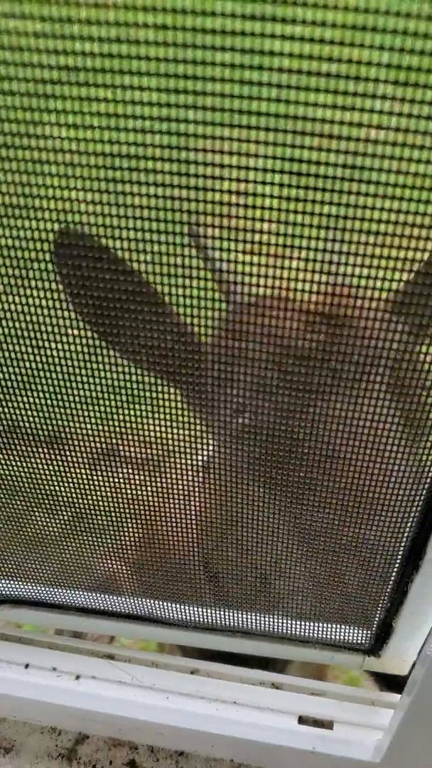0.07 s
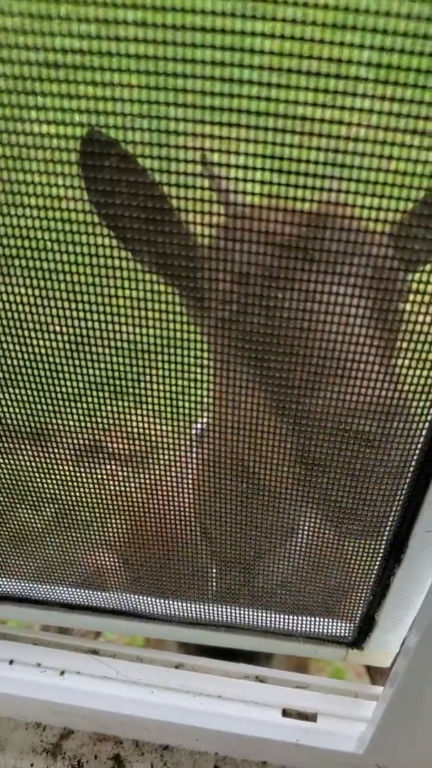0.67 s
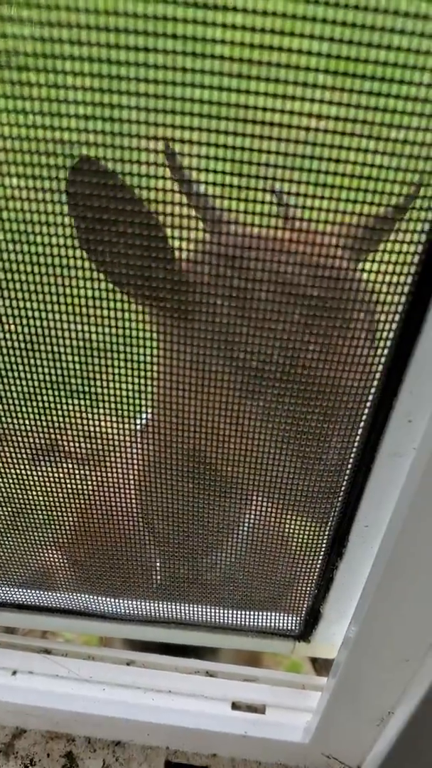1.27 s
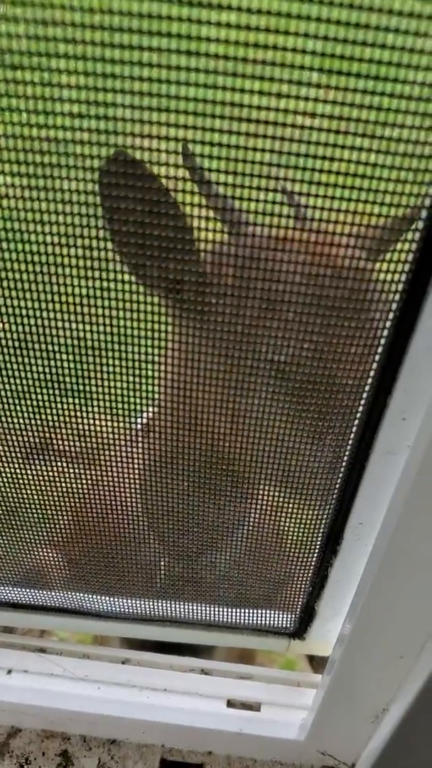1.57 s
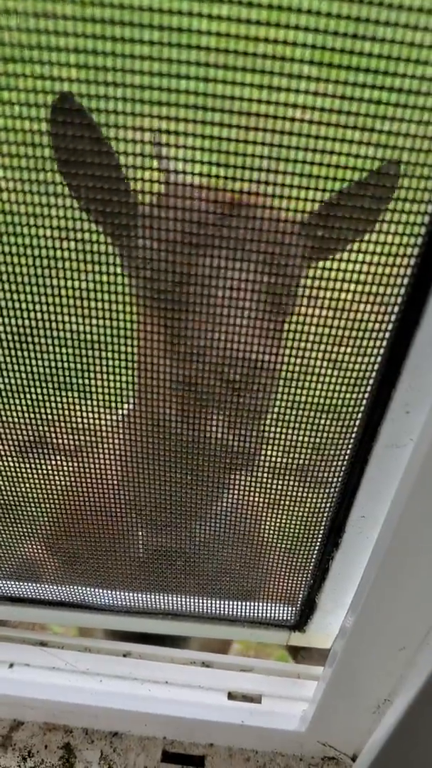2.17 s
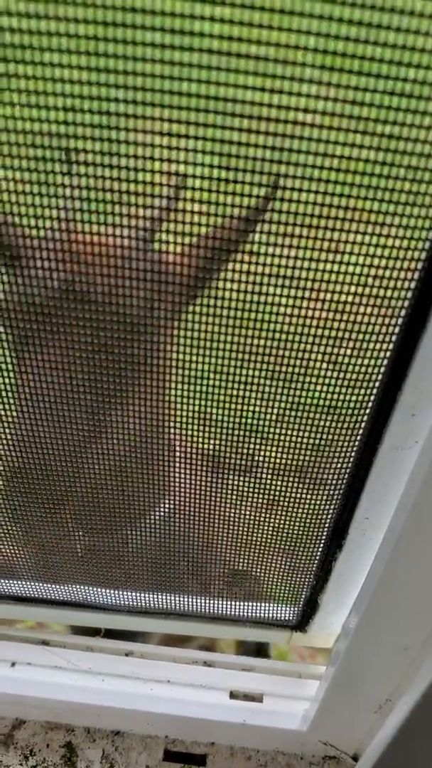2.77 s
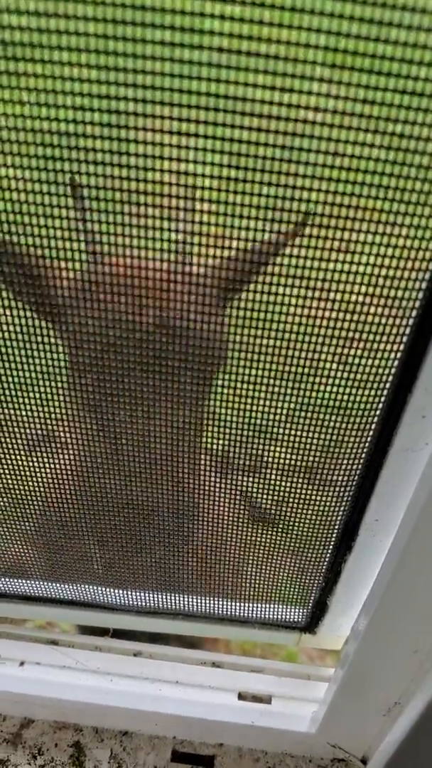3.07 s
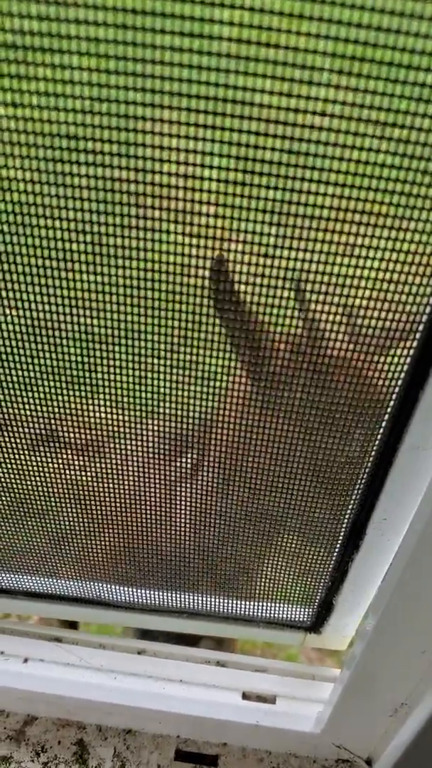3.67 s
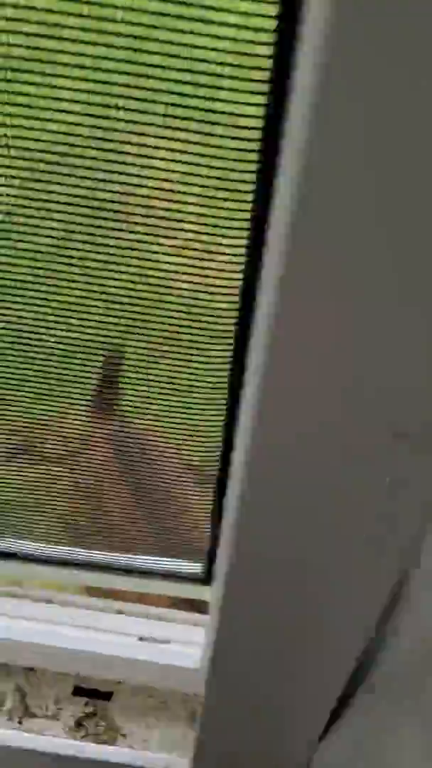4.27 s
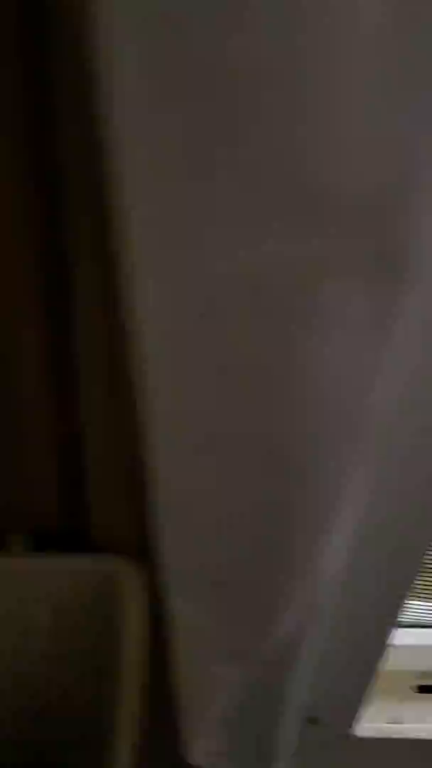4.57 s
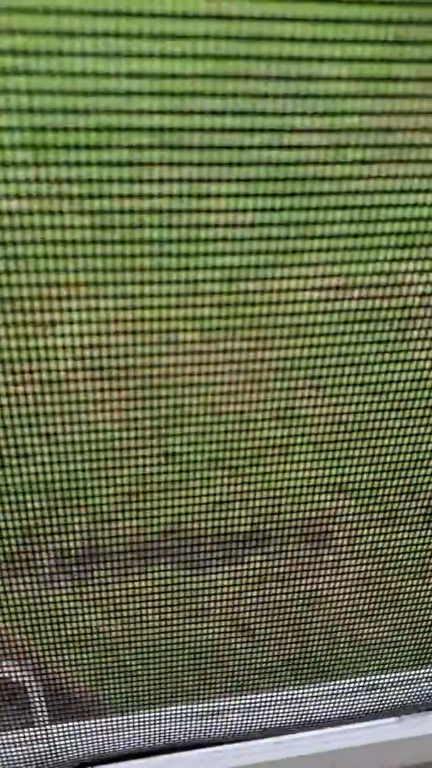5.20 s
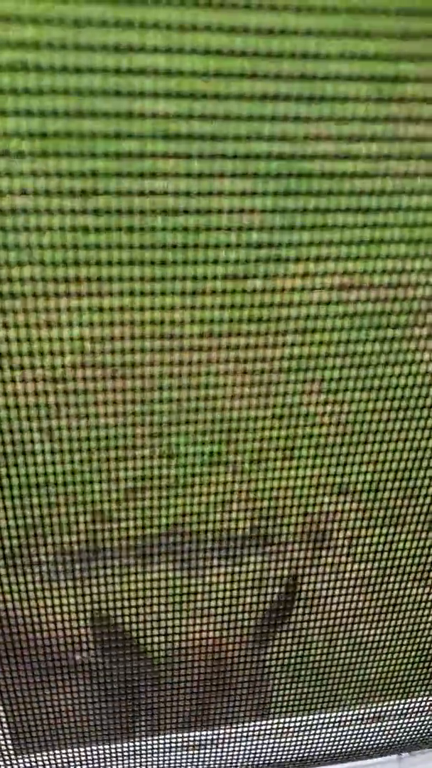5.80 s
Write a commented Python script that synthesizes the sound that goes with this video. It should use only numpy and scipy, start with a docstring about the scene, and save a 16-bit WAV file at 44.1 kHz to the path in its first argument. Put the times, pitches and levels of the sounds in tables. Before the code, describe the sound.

A young goat bleats three times close by, thin and throbbing, with faint birds outdoors and soft bumps on the microphone.

```python
"""A young goat bleats three times at a window screen, the last time from below the sill.
Pulses from its vocal folds excite the resonances of its throat, giving a thin, rough voice
broken by strong throbs about ten times a second. Small birds whistle far off over a quiet yard.
A hand bumps the nearby camera it holds, and the case conducts this to the right microphone."""
import sys
import numpy as np
from scipy import signal
from scipy.fft import rfft, irfft
from scipy.io import wavfile
from scipy.ndimage import uniform_filter1d, minimum_filter1d

SR = 44100
rng = np.random.default_rng(int(sys.argv[2]) if len(sys.argv) > 2 else 0)


def waveform_to_disk(signal):
    """Save audio, clipped to [-1, 1], as 16-bit WAV at the path in sys.argv[1]."""
    frames = np.transpose(np.atleast_2d(signal))
    scaled = np.clip(frames, -1, 1) * 32767
    samples = np.round(scaled).astype(np.int16)
    wavfile.write(sys.argv[1], SR, samples)


N = 261954
TIME = np.arange(N) / SR

# Roughness runs from 0 to 1; mouth opening from -1 (closed) through 0 (ajar) to 1 (wide).
# thin voice between throbs: start_s, end_s, first_level_db, last_level_db, rest_pitch_hz,
# first_roughness, last_roughness, first_mouth, last_mouth
BLEATS = [ (-.03, .432, -15.5, -26.5, 448.1, .16, 0.6, 0, 0.77),
          (2.06, 2.452, -24, -23, 478.7, .12, .36, 0.41, 0.93),
          (4.972, 5.402, -42.5, -34, 407.5, .5, .7, 0.43, 0.43)]
# surges of the voice: start_s, length_s, level_db, crest_pitch_hz, first_pitch_hz, last_pitch_hz,
# roughness, mouth, edge_db, sizzle_db
THROBS = [ (0.015, 0.032, -11.5, 471, 451.8, 442.6, 0.25, -0.38, 3, 6),
          (0.11, 0.041, -11, 487, 466.8, 419, 0.05, 0.59, -3, 2),
          (0.209, 0.04, -12.5, 476, 447, 427.3, 0.12, 0.65, -2, 4.5),
          (0.312, 0.038, -12, 470, 427.6, 415.6, 0.17, 0.78, 3.5, 2.5),
          (2.159, 0.013, -20, 473, 446.3, 426, 0.65, 0.2, -15, -12),
          (2.235, 0.029, -14, 566.4, 457, 444, 0.17, 0.63, 1.5, 5.5),
          (2.348, .027, -20, 559, 414, 395.3, 0.67, 1, 3, 1),
          (5.002, .031, -34, 383.4, 381, 385.6, 0.16, -0.29, -23, -6),
          (5.096, 0.035, -24.5, 431.5, 419, 377, 0.1, 0.31, -10.5, -5),
          (5.189, 0.054, -25.5, 448.5, 390, 375, 0.07, 0.49, -6, -5),
          (5.287, 0.045, -24.5, 428, 399, 394, 0, 0.74, 9, 0)]
# single hard slaps of the vocal folds: time_s, boost_db
CATCHES = [(0.361, 9.5), (2.232, 8), (2.27, 9.5), (2.353, 9), (2.362, 3.5), (2.4334, 6)]
# throat response with the mouth closed, ajar and wide: frequency_hz, gain_db
THROAT_CLOSED = [(60, -74), (300, -28), (520, -2), (700, 12), (950, -23), (1400, -10), (2300, -18),
                 (3000, -6.5), (3800, 11), (4600, -3), (5500, 6), (6400, -19), (7300, -42)]
THROAT_AJAR = [(60, -74), (250, -12), (440, -21), (900, -9), (1300, -17), (1850, -3.5), (2300, -15),
               (3050, 1), (3550, -2), (4300, -4), (5350, -5), (5850, -20), (6600, -17.5), (7300, -51)]
THROAT_WIDE = [(60, -67.5), (250, -34), (440, -14), (690, 1), (860, 6), (1250, -5), (1700, -11.5),
               (2150, 0), (2600, -9.5), (3050, -1), (3550, -2.5), (4600, -16.5), (5400, -5.5), (6100, -20),
               (7300, -49.5)]
# treble band above the throat's resonances: frequency_hz, gain_db
SIZZLE = [(6000, -67), (7500, -49.5), (8300, -38), (9200, -38), (10500, -46.5), (12000, -61), (15500, -77)]
# change of colour at full roughness: frequency_hz, gain_db
ROUGH_COLOUR = [(900, 3), (1300, -2.5), (2300, -1), (3000, 0)]
# paths from the goat, straight and round the sill: frequency_hz, gain_db
DIRECT_PATH = [(100, 0), (10000, 0)]
SILL_PATH = [(400, 9.5), (620, -9.5), (850, 4.5), (1200, 5), (2000, 6.5), (2700, 0.5), (3300, 0), (4300, 4),
             (5400, 1), (6200, 5), (9000, -6), (14000, 4)]
# response of the right microphone, which faces away from the goat: frequency_hz, gain_db
RIGHT_SHADOW = [(250, -14.5), (380, 3), (450, 0.5), (860, -10.5), (1300, -17), (1750, -8), (2600, -20),
                (3050, -21.5), (3600, -34.5), (5500, -25), (9000, -30), (11500, -3), (15000, -15)]
# reverberation of the yard: frequency_hz, t60_s
YARD_T60 = [(200, .35), (1000, 0.35), (3000, 0.33), (5500, 0.44), (12000, 0.76)]
# bumps of the hand: time_s, level_db, width_s, relative_knock_db
BUMPS = [(0.68, -25.5, 0.023, -27), (0.771, -24, 0.01, -10), (0.847, -11.5, 0.018, -13.5),
         (1.468, -26, 0.02, -28), (1.808, -9.5, 0.0075, -16.5), (2.732, -14.5, 0.019, -9),
         (3.616, -10.5, 0.017, -11.5), (4.419, -4.5, 0.011, -22), (4.541, -17, 0.013, -2.5),
         (4.635, -13.5, 0.021, -34), (4.694, -1.5, 0.0071, -10.5), (4.748, -13.5, 0.019, -21),
         (4.788, -9, 0.017, -12), (4.815, -3.5, 0.0077, -11.5), (4.985, -23, 0.024, -3.5),
         (5.655, -17.5, 0.015, -16)]
# spectrum of the grip's rumble: frequency_hz, relative_density_db
RUMBLE = [(15, -21), (30, -15), (48, 0.5), (75, -4.5), (105, -6.5), (140, -33), (220, -27), (400, -41),
          (800, -80.5)]
# bird whistles: start_s, length_s, first_pitch_hz, last_pitch_hz, level_db,
# bend (larger falls earlier), buzz (share of the pitch)
WHISTLES = [(0.546, 0.018, 5770, 5380, -48.5, 1, 0.022), (0.596, 0.066, 6500, 5220, -53.5, 0.35, 0.022),
            (1.028, 0.042, 5500, 4820, -53.5, 1, .035), (1.096, 0.13, 5330, 3920, -48.5, 0.53, .04),
            (1.833, 0.11, 3867, 3642, -36, 4.08, 0.0052), (1.905, 0.029, 3700, 3660, -41, .2, 0.0022),
            (1.985, 0.1, 4440, 3520, -35, 5, 0.014), (5.61, 0.17, 4030, 3490, -58, 5.1, .008),
            (5.764, 0.055, 4620, 3490, -50.5, 1.34, 0.015), (5.818, .11, 3500, 3500, -53, 1.1, 0.0083)]
# spectrum of the outdoor wash: frequency_hz, relative_density_db
AIR_SPECTRUM = [(88, -28.5), (150, 1), (240, -2.5), (303, -6.5), (372, -1.5), (980, -18.5), (1260, -17.5),
                (3370, -26), (3760, -26.5), (5300, -24), (5830, -21), (6300, -22), (8190, -34)]
# treble response of the microphones to the wash: frequency_hz, gain_db
AIR_TREBLE = [(6300, -5.5), (6700, -15.5), (7400, -25), (8600, -9), (10500, -20), (15500, -30.5)]
# stereo balance of the wash: frequency_hz, left_minus_right_db
AIR_BALANCE = [(150, -30), (280, -8.5), (460, -5.5), (770, 3.5), (2150, -2.5), (3580, 6.5), (5960, 21),
               (9000, 21), (12000, -6.5)]
# likeness of the wash at the two microphones: frequency_hz, correlation
AIR_CORRELATION = [(100, 0.64), (250, 0.77), (450, 0.61), (850, 0)]
# envelope of the wash: time_s, level_db
AIR_LEVEL = [(.4, -51.5), (1.06, -52.5), (2.2, -48), (3.26, -49), (4.63, -44.5), (4.9, -55), (5.4, -49),
             (5.94, -53.5)]
# ticks and scuffs at the sill: start_s, level_db, decay_s
SCUFFS = [(1.454, -73, 0.0016), (2.894, -52, 0.0019), (3.792, -47.5, 0.043), (4.19, -58, 0.024),
          (4.428, -48.5, 0.016), (4.809, -59, 0.0033)]
# spectrum of a scuff: frequency_hz, relative_density_db
SCUFF_SPECTRUM = [(200, -13), (700, -1), (3500, 5), (6200, -6), (7400, -17), (8600, -9), (15500, -37)]
# tones of the hum: pitch_hz, level_db
HUM_TONES = [(167, -63), (361, -61)]


def goat():
    """Direct and reflected sound: two bleats face the screen; the ducked third carries more echo."""
    first = bleat(BLEATS[0], DIRECT_PATH, sizzle_db=-5.5, ripple_db=2.0, rasp=1.0)
    second = bleat(BLEATS[1], DIRECT_PATH, sizzle_db=8.0, ripple_db=7.5, rasp=0.98)
    third = bleat(BLEATS[2], SILL_PATH, sizzle_db=7.5, ripple_db=6.5, rasp=0.52)
    facing = yard_echo(first + second, near_db=-10, tail_db=-25, near_decay_s=0.0072)
    ducked = yard_echo(third, near_db=-7, tail_db=-18.5, near_decay_s=0.015)
    return microphones(facing, right_db=1.5) + microphones(ducked, right_db=2.5)


def bleat(call, path, sizzle_db, ripple_db, rasp, jitter=.15, shimmer_db=3, size=1024):
    """Source and filter: each vocal-fold closure rings the throat; roughness makes pulses irregular."""
    controls = throbbing_voice(call)
    hz, age = np.fft.rfftfreq(size, 1 / SR), np.arange(size) / SR
    closed, ajar, wide = curve(THROAT_CLOSED, hz), curve(THROAT_AJAR, hz), curve(THROAT_WIDE, hz)
    sizzle, path_db, rough_db = curve(SIZZLE, hz), curve(path, hz), curve(ROUGH_COLOUR, hz)
    edge_band = np.clip((hz - 3500) / 2000, 0, 1)
    rolloff_db = curve([(7300, -3.5), (15000, -13)], hz)
    out, now = np.zeros(N), max(call[0], 0)
    while now < call[1]:
        db, pitch_hz, rough, mouth, edge_db, throb_sizzle_db = controls[:, int(now * SR)]
        vowel_db = ajar + abs(mouth) * ((wide if mouth > 0 else closed) - ajar)
        throat = gain_of(vowel_db + rolloff_db + edge_band * edge_db + rough * rough_db)
        throat += gain_of(sizzle + sizzle_db + throb_sizzle_db)
        ripple = unit_rms(uniform_filter1d(rng.standard_normal(len(hz)), size=14))
        ring = minimum_phase(20 * np.log10(throat) + path_db + ripple_db * (rough + 0.054) * ripple)
        # each closure is an impulse with a puff of turbulent air
        closure = np.exp(-2j * np.pi * hz / SR * (now * SR % 1 + 16))
        puff = rfft(unit_rms(rng.standard_normal(size) * np.exp(-age / 0.00051))) / np.sqrt(size)
        pulse = irfft(ring * (closure + (0.019 + rasp * rough) * (0.14 + hz / 5000) * puff))
        db += sum(boost_db for at, boost_db in CATCHES if abs(now - at) < .5 / pitch_hz)
        db += shimmer_db * (rough + 0.2) * np.clip(rng.standard_normal(), -2, 1.5)
        strength = gain_of(db) * np.sqrt(SR / pitch_hz)
        add(out, int(now * SR) / SR, strength * pulse / np.linalg.norm(pulse))
        stumble = jitter * rough ** 2 * rng.standard_normal() + 0.0025 * rng.standard_normal()
        now += np.exp(stumble) / pitch_hz
    return out


def throbbing_voice(call):
    """Amplitude and frequency modulation: in each throb the voice swells and its pitch mostly sags."""
    throbs = [row for row in THROBS if call[0] < row[0] < call[1]]
    voice = creak(thin_voice(call, throbs))
    controls = np.vstack([voice, np.zeros((2, N))])  # edge and sizzle rest at 0 dB
    for start, length, db, _, first_hz, last_hz, rough, mouth, edge_db, sizzle_db in throbs:
        progress = np.clip((TIME - start) / length, 0, 1)
        fade_in = np.clip((TIME - start) / .012 + .5, 0, 1)
        fade_out = np.clip((start + length - TIME) / 0.0034 + .5, 0, 1)
        push = np.sin(.8 * np.pi * progress ** 1.48) - .7  # peaks late in the throb
        pitch_hz = last_hz + (first_hz - last_hz) * (1 - progress) ** 1.6
        throb = (db + 4.0 * push, pitch_hz, rough, mouth + 0.11 * push, edge_db, sizzle_db)
        controls = blend(controls, throb, fade_in * fade_out)
    return controls


def thin_voice(call, throbs, fade_s=.032, fade_db=13.5, wobble=.012):
    """Sustained phonation: level, pitch, roughness and mouth opening glide between the throbs."""
    start, end, first_db, last_db, rest_hz, first_rough, last_rough, first_mouth, last_mouth = call
    progress = np.clip((TIME - start) / (end - start), 0, 1)
    db = first_db + (last_db - first_db) * progress
    db -= fade_db * np.clip(1 - (TIME - start) / fade_s, 0, 1)
    db -= fade_db * np.clip(1 - (end - TIME) / fade_s, 0, 1)
    rough = first_rough + (last_rough - first_rough) * progress
    mouth = first_mouth + (last_mouth - first_mouth) * progress ** 0.83
    turns = [(start, rest_hz), (end - 0.037, 1.06 * rest_hz), (end, .8 * rest_hz)]  # closing fall
    for on, length, throb_db, crest_hz, first_hz, last_hz, *_ in throbs:
        off = on + length
        turns += [(on - .022, crest_hz), (on, first_hz), (off, last_hz), (off + .01, rest_hz)]
        # the level leans toward the throb's on both sides of it
        away = np.maximum(on - TIME, 0) / 0.012 + np.maximum(TIME - off, 0) / 0.0067
        db += .52 * (throb_db - db) * np.exp(-away)
        rough += .3 * np.exp(-((TIME - off) / .012) ** 2)  # rougher as the throb breaks off
    pitch_hz = np.interp(TIME, *np.transpose(sorted(turns))) * (1 + wobble * wander(rate_hz=35))
    return np.array([db, pitch_hz, np.clip(rough, 0, 1), mouth])


def creak(voice, start_s=2.05, end_s=2.121, flip_s=.016, pitch_hz=165.7, rough=0.27):
    """Pulse register: the second bleat starts with slow fold vibration behind nearly closed lips."""
    db = voice[0] + 0.5
    mouth = -0.98 + 1.8 * (TIME - start_s)
    creaking = (TIME > start_s) * np.clip((end_s - TIME) / flip_s + .5, 0, 1)
    return blend(voice, (db, pitch_hz, rough, mouth), creaking)


def hand(rocking_hz=66.3, knock_hz=235, grip_db=-41, stir_db=-24.5, stir_s=0.11):
    """Structure-borne sound: grip and bumps pass through the case, mainly to the right microphone."""
    rumble = coloured_noise(RUMBLE)
    # the grip shifts round each bump
    stir_power = sum(gain_of(db + stir_db) ** 2 * np.exp(-abs(TIME - at) / stir_s)
                     for at, db, *_ in BUMPS)
    out = rumble * np.sqrt(gain_of(grip_db) ** 2 + stir_power) * gain_of(2.93 * wander(21.5))
    for at, db, width, knock_db in BUMPS:
        t = TIME - at
        rocking = np.cos(2 * np.pi * rocking_hz * t) / np.cosh(np.clip(2.3 * t / width, -50, 50))
        age = np.maximum(t + 0.00706, 0)  # the case knocks as the push builds
        envelope = 1.44 * np.exp(-age / 0.0071) * (1 - np.exp(-age / 0.0013))
        knock = envelope * np.sin(2 * np.pi * knock_hz * age)
        out += gain_of(db) * (rocking + gain_of(knock_db) * knock)
    out = signal.sosfilt(signal.butter(1, 8, "high", fs=SR, output="sos"), out)
    return out * gain_of([[-40], [0]])


def birds():
    """Frequency modulation: distant whistles fall and level out; fast pitch noise makes some buzz."""
    out, waver = np.zeros(N), wander(rate_hz=320)
    for start, length, first_hz, last_hz, db, bend, buzz in WHISTLES:
        progress = np.linspace(0, 1, int(length * SR))
        fall = (np.exp(-bend * progress) - np.exp(-bend)) / (1 - np.exp(-bend))
        flutter = waver[int(start * SR) - len(progress):int(start * SR)]
        pitch_hz = (last_hz + (first_hz - last_hz) * fall) * (1 + buzz * flutter)
        envelope = np.sin(np.pi * progress).clip(0) ** 0.67
        add(out, start, gain_of(db) * envelope * tone(pitch_hz))
    return microphones(yard_echo(out, near_db=-19, tail_db=-6.5), right_db=1.5)


def air(drift_db=.8):
    """Partial coherence: a soft, drifting outdoor wash, alike at both microphones only in the bass."""
    hz = np.fft.rfftfreq(N, 1 / SR)
    colour = gain_of(curve(AIR_SPECTRUM, hz) + curve(AIR_TREBLE, hz))
    correlation, balance = curve(AIR_CORRELATION, hz), gain_of(curve(AIR_BALANCE, hz))
    common, separate = rfft(rng.standard_normal((2, N)))
    left = balance * common
    right = correlation * common + np.sqrt(1 - correlation ** 2) * separate
    pair = irfft(np.array([left, right]) * colour / np.hypot(1, balance), N)
    level_db = np.interp(TIME, *np.transpose(AIR_LEVEL)) + drift_db * wander(7.8)
    return pair / pair.mean(0).std() * gain_of(level_db)


def scuffs():
    """Contact noise: ticks and scuffs at the sill start abruptly and decay exponentially."""
    envelope = sum(gain_of(db) * (TIME > start) * np.exp(-abs(TIME - start) / decay)
                   for start, db, decay in SCUFFS)
    return envelope * coloured_noise(SCUFF_SPECTRUM) * gain_of([[0], [-8]])


def hum():
    """Slow random modulation: two faint low tones waver in level and pitch."""
    tones = sum(gain_of(db + 1.33 * wander(0.7)) * tone(hz + 2.5 * wander(5.65)) for hz, db in HUM_TONES)
    return tones * gain_of([[-2], [6]])


def yard_echo(sound, near_db, tail_db, near_decay_s=0.0071):
    """Reflection: early echoes off wall and window frame, then a tail, distinct at each microphone."""
    taps = rng.standard_normal((2, SR)) * (rng.random((2, SR)) < .08)
    age = np.arange(SR) / SR
    near = taps * np.exp(-age / near_decay_s) * (age > .0015)
    hz, t, spectra = signal.stft(taps * (age > .015), SR, nperseg=256)
    decay = gain_of(-60 * t / curve(YARD_T60, hz)[:, None])
    tail = signal.istft(spectra * decay, SR, nperseg=256)[1][:, :SR]
    echo = sum(gain_of(db) * part / np.linalg.norm(part, axis=1, keepdims=True)
               for db, part in ((near_db, near), (tail_db, tail)))
    return sound + signal.fftconvolve(sound[None], echo, axes=1)[:, :N]


def microphones(pair, right_db, lag_s=0.00019):
    """Acoustic shadow: sound from the window reaches the right microphone later and duller."""
    hz = np.fft.rfftfreq(1024, 1 / SR)
    delay = np.exp(-2j * np.pi * hz * lag_s)
    shadow = irfft(minimum_phase(curve(RIGHT_SHADOW, hz) + right_db) * delay)
    return np.array([pair[0], signal.fftconvolve(pair[1], shadow)[:N]])


def gain_of(db):
    """Amplitude ratio of a level in decibels."""
    return 10 ** (np.asarray(db) / 20)


def unit_rms(x):
    """Normalisation to unit power."""
    return x / np.sqrt(np.mean(x ** 2) + 1e-20)


def curve(points, hz):
    """Linear interpolation on a log-frequency axis."""
    knots_hz, values = np.transpose(points)
    return np.interp(np.log(hz + 1), np.log(knots_hz + 1), values)


def blend(controls, target, share):
    """Linear crossfade of voice controls toward a target."""
    return controls + share * (np.array(np.broadcast_arrays(*target)) - controls)


def add(mix, start_s, sound):
    """Superposition of a sound on the mix."""
    part = mix[max(round(start_s * SR), 0):][:len(sound)]
    part += sound[:len(part)]


def tone(pitch_hz):
    """A sinusoid whose phase is the integral of its frequency."""
    return np.sin(2 * np.pi * np.cumsum(pitch_hz) / SR)


def coloured_noise(spectrum):
    """Spectral shaping of white noise, at unit power."""
    colour = gain_of(curve(spectrum, np.fft.rfftfreq(N, 1 / SR)))
    return unit_rms(irfft(rfft(rng.standard_normal(N)) * colour, N))


def wander(rate_hz):
    """Low-pass noise: a smooth fluctuation of unit power."""
    lowpass = np.exp(-(np.fft.rfftfreq(N, 1 / SR) / rate_hz) ** 2)
    return unit_rms(irfft(rfft(rng.standard_normal(N)) * lowpass, N))


def minimum_phase(db):
    """Causality: a response with these levels that rings only after its excitation."""
    log_gain = np.log(gain_of(np.concatenate([db, db[-2:0:-1]])))
    return np.exp(np.conj(signal.hilbert(log_gain)))[:len(db)]


def scene():
    """Superposition of all sources at the two microphones."""
    return goat() + birds() + air() + scuffs() + hum() + hand()


def record(dry, cutoff_hz=15800):
    """Peak limiting holds the loudest pulses at full scale; a low-pass filter then limits the band."""
    allowed_gain = 1 / np.maximum(abs(dry).max(0), 1)
    limited = dry * uniform_filter1d(minimum_filter1d(allowed_gain, size=161), size=161)
    lowpass = signal.firwin(511, cutoff_hz, window=("kaiser", 9), fs=SR)
    return signal.oaconvolve(limited, lowpass[None], "same")


dry = scene()
out = record(dry)
waveform_to_disk(out)
```